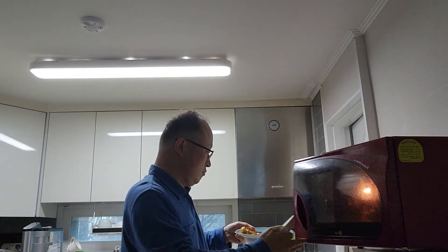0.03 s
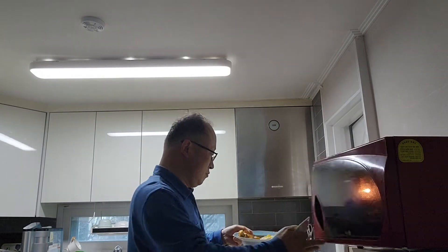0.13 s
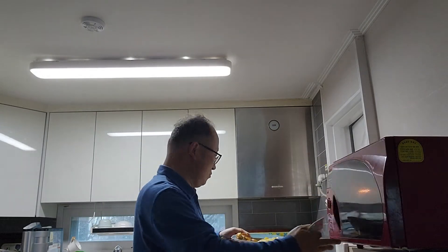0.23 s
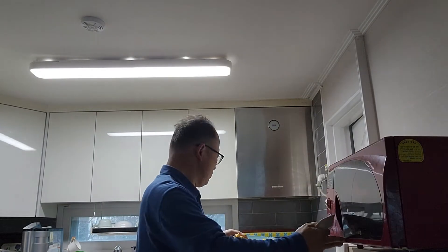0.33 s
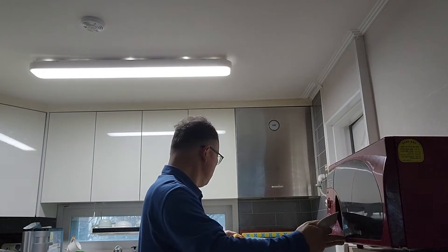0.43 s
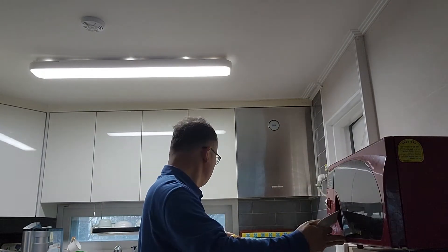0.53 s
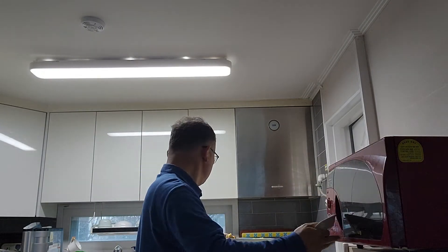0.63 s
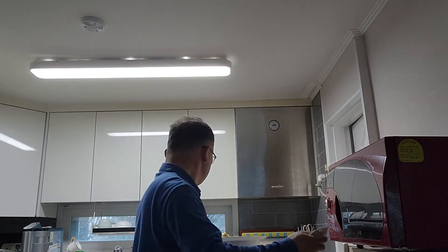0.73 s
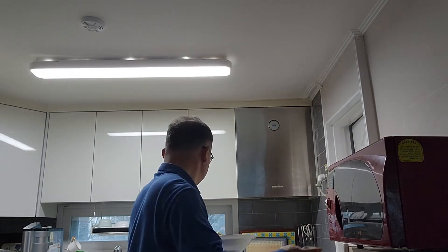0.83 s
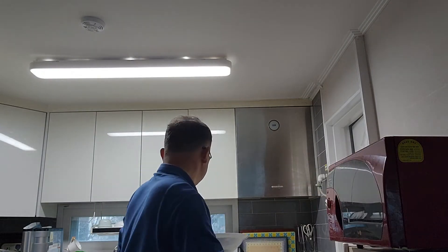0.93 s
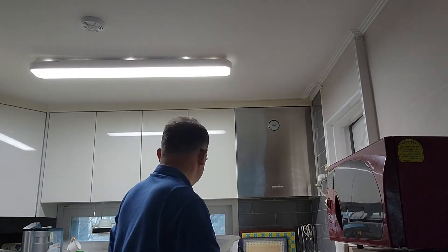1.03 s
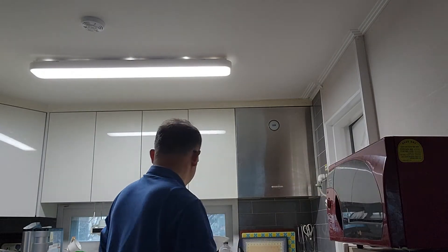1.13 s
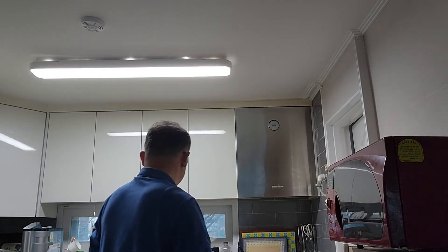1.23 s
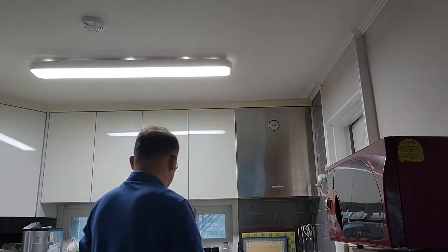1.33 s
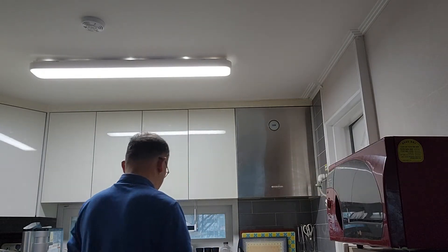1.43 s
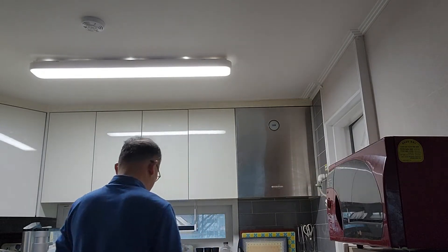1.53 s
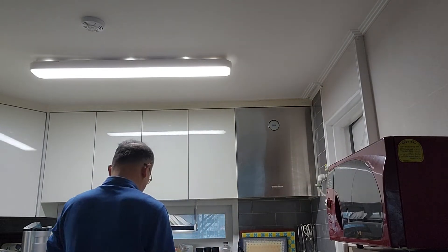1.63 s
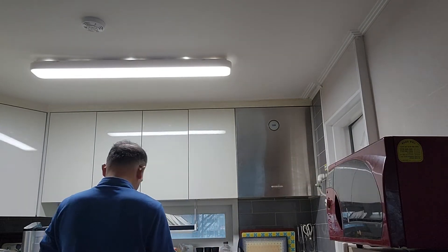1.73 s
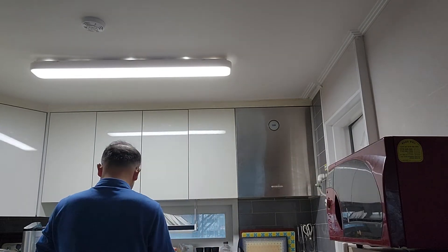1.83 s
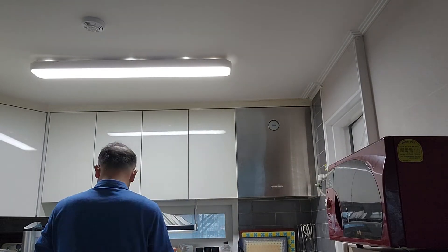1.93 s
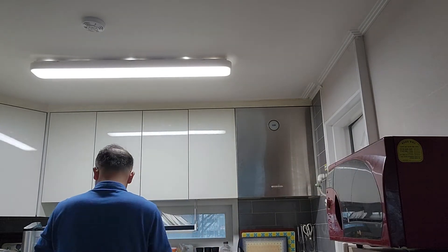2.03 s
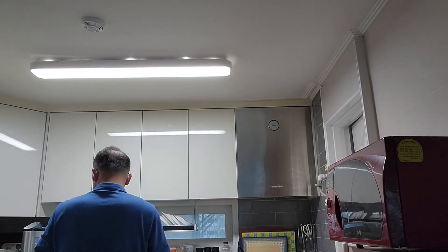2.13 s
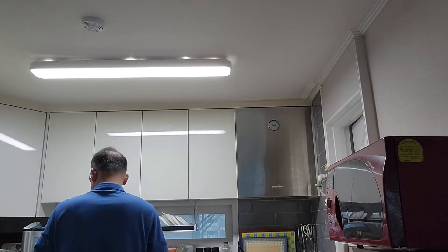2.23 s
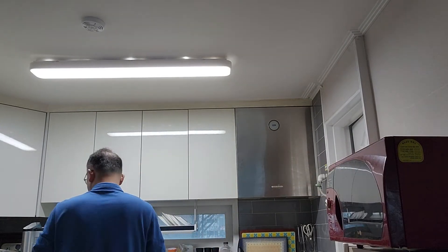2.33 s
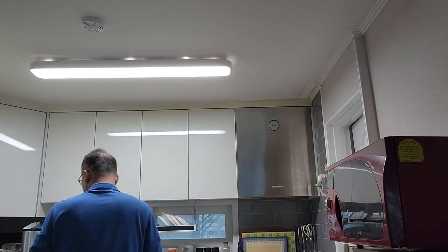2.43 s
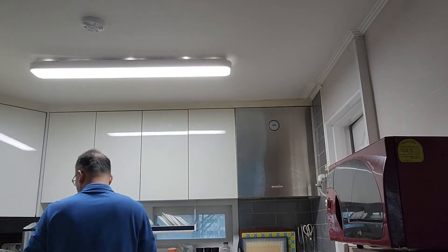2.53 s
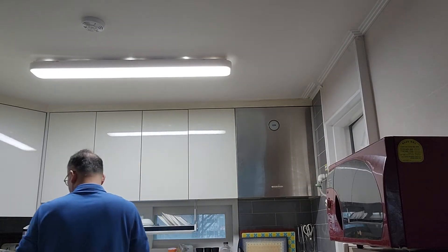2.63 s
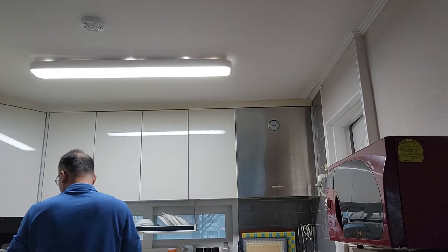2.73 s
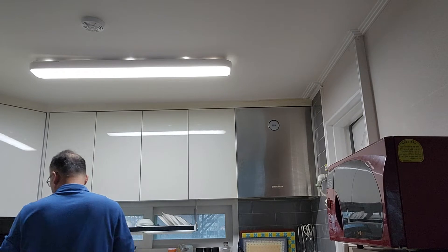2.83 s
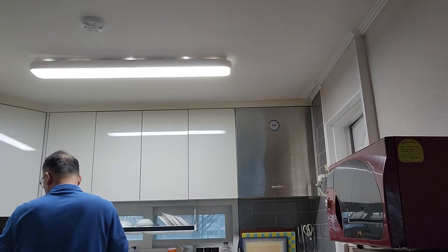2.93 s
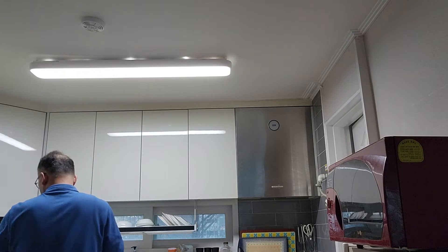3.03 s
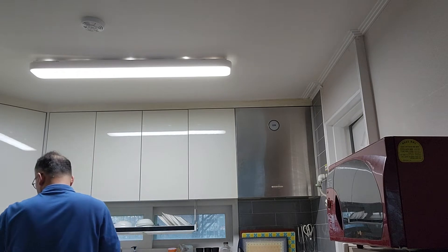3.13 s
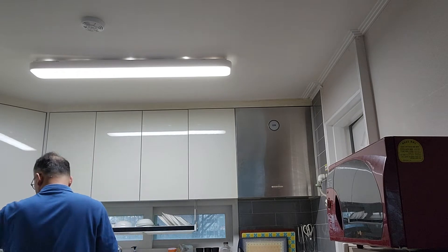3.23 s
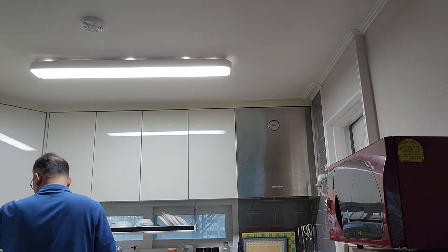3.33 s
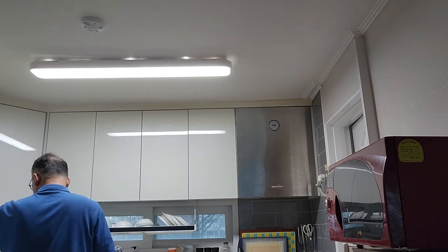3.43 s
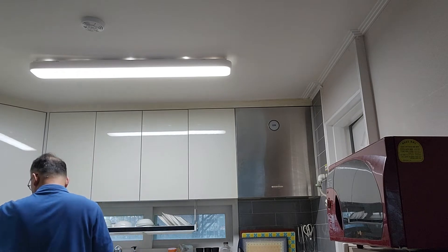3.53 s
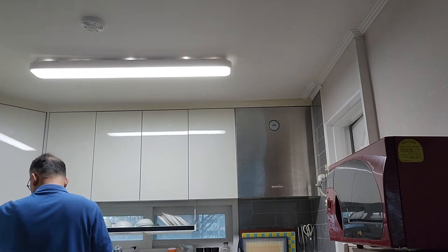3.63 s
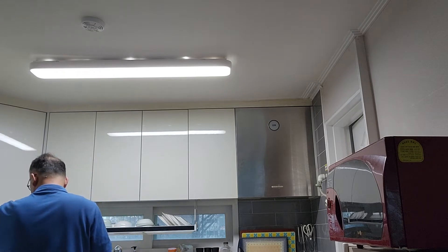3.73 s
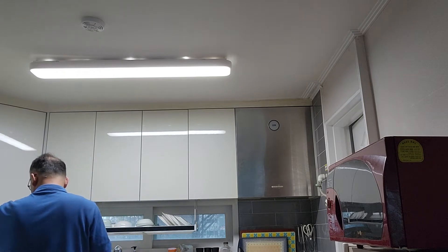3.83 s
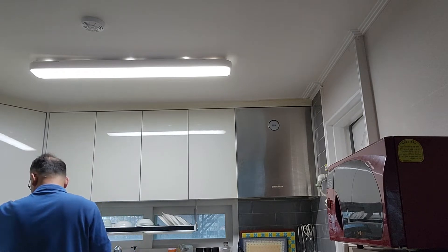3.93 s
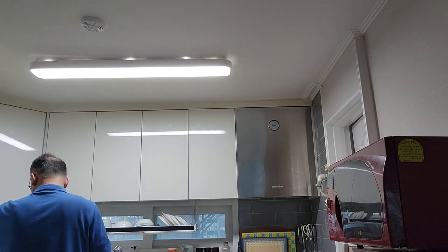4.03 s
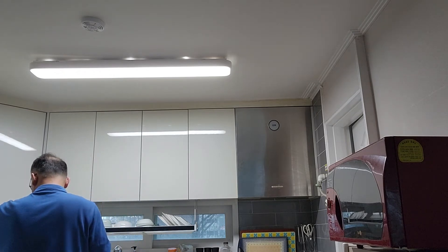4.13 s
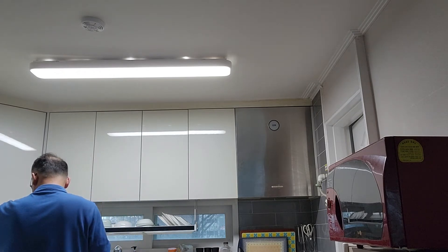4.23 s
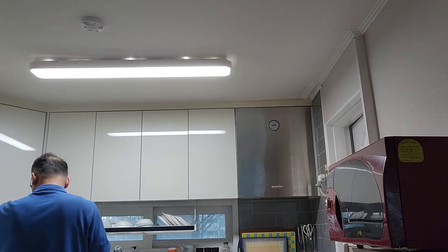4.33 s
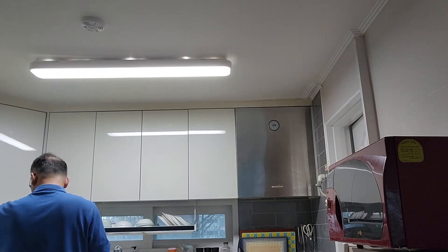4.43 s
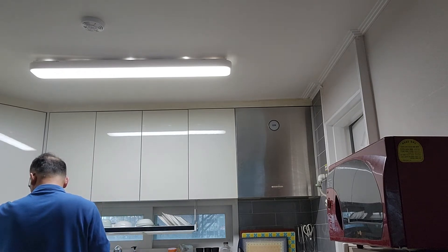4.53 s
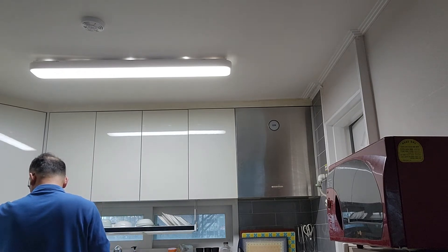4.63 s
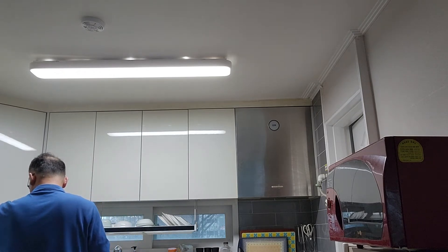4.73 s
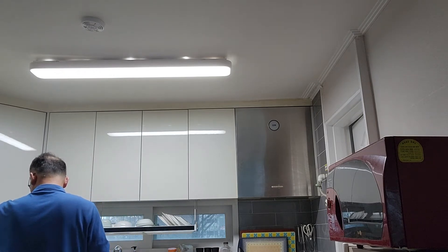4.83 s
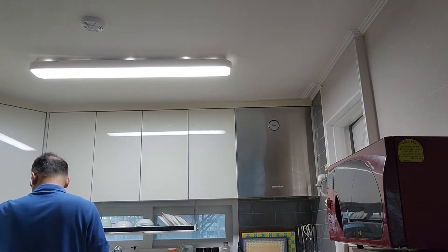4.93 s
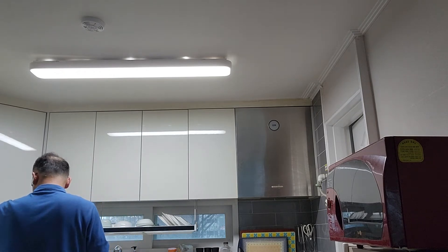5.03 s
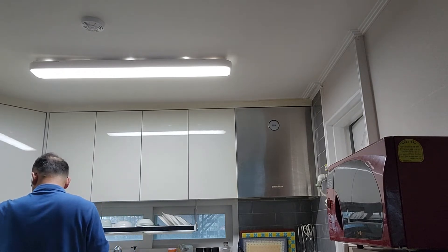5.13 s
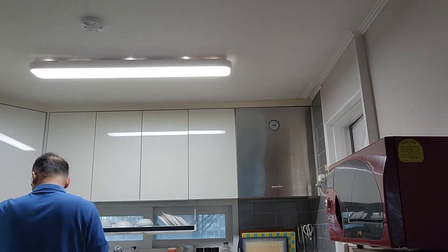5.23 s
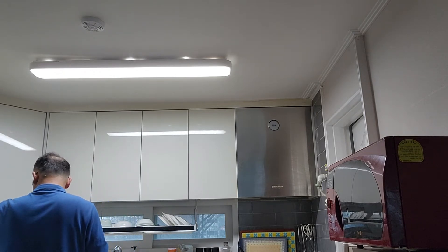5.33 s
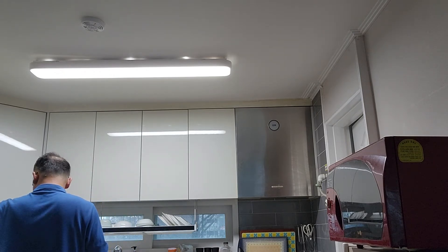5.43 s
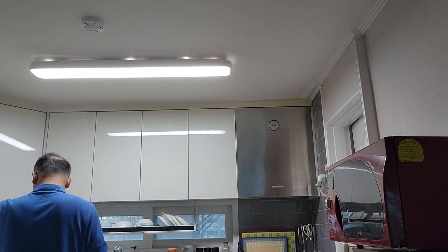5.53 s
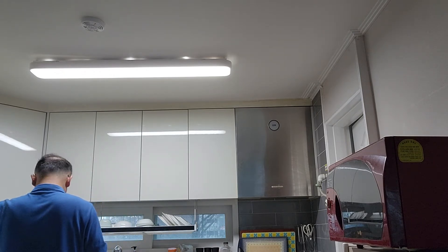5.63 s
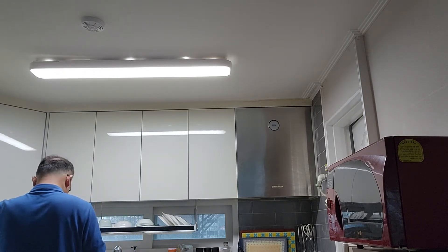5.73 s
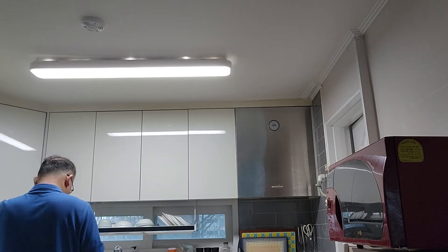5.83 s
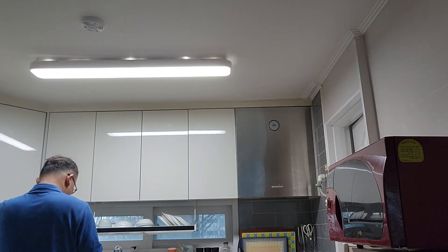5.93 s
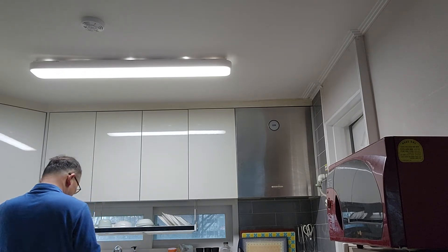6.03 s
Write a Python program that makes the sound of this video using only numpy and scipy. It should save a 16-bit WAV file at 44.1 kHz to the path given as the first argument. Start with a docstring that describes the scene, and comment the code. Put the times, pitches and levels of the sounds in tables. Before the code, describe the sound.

A low, faint room hum runs throughout in a small kitchen whose hard walls add a short echo. At about 0.4 seconds a microwave door is pushed shut: the latch clicks and snaps, the panels rattle briefly and the case gives a low thump. This is the loudest sound. A few faint handling taps and slight rustles follow between 0.8 and 2.3 seconds. At about 2.6 seconds china is put down across the room, slightly to the left, with a bright, ringing clatter, and it clatters again at about 3.1 seconds. From 3.7 seconds something soft, like a cloth, rubs in short, quiet strokes among light taps, strongest between 4.8 and 5.4 seconds. A soft hollow knock comes near 5.5 seconds and a last faint tap at 5.8 seconds.

```python
"""Microwave door, crockery and cloth.

A microwave door is pushed shut in a small hard-walled kitchen: the latch snaps, the door thumps
into the case. Across the room crockery is put down and clatters twice. Then something soft, like
a cloth, rubs in short strokes. Light handling taps in between; low room hum throughout."""
import sys
import numpy as np
from scipy import signal
from scipy.fft import rfft, irfft, next_fast_len
from scipy.io import wavfile

SR = 44100
rng = np.random.default_rng(int(sys.argv[2]) if len(sys.argv) > 2 else 0)


def digitize_waveform(pressure):
    """Quantize a signal to 16-bit integers and store it at the path in sys.argv[1].

    Rows of a 2-D input are taken as channels; values are limited to [-1, 1].
    """
    field = np.atleast_2d(pressure).T
    bounded = np.clip(field, -1, 1)
    quanta = np.round(bounded * 32767).astype(np.int16)
    wavfile.write(sys.argv[1], SR, quanta)


N = 268172

# flat spectrum: freq_hz, density_db
FLAT_SPECTRUM = [(20, 0), (20000, 0)]
# left-right likeness: freq_hz, correlation
MIC_COHERENCE = [(60, .93), (200, 0.5), (380, .7), (700, 0.44), (1300, .1), (2400, -0.051), (5000, 0.059),
                 (15000, 0)]
# kitchen reverberation: freq_hz, t60_s
ROOM_DECAY = [(60, .6), (170, 1), (340, 0.54), (680, 0.38), (1400, 0.36), (2700, 0.24), (5500, 0.17),
              (11000, 0.073), (16000, .18)]
# house rumble: freq_hz, density_db
RUMBLE_SPECTRUM = [(12, -37), (20, -2.5), (65, -3), (172, -17), (209, -16.5), (261, -18.5), (326, -18),
                   (375, -26), (408, -18.5), (482, -27), (693, -25), (775, -28.5), (1080, -33),
                   (1510, -36.5), (7500, -51), (10000, -59.5), (15800, -61.5)]
# motor somewhere in the house: pitch_hz, level_db
MOTOR_TONES = [(211.7, -79.5), (354, -84.5)]

# light handling taps: start_s, level_db
TAP_HITS = [(0.788, -41), (0.81, -40.5), (1.07, -42), (1.797, -39), (2.2441, -28), (2.258, -40),
            (3.805, -43.5), (4.104, -35.5), (4.552, -31.5), (5.8, -39.5)]
# tap colour: freq_hz, density_db
TAP_SPECTRUM = [(100, 5), (400, 14.5), (750, 11.5), (1000, 15), (1400, 7.5), (2200, 9.5), (4000, 3.5),
                (7000, -2), (11000, -21), (15500, -14.5)]
# soft knock: start_s, level_db, contact_s
KNOCK_PULSES = [(5.4535, -43, 0.00041), (5.461, -28, 0.0017)]
# hollow object: pitch_hz, level_db, t60_s
HOLLOW_MODES = [(690, -2, .05), (760, 0, .05)]

# hand strokes: start_s, swell_s, hold_s, hiss_db, body_db
CLOTH_STROKES = [ (1.006, 0.054, 0.067, -78.5, -83), (1.646, 0.026, .02, -79.5, -75.5),
                 (1.972, .02, .006, -71.5, -83), (2.33, 0.048, .04, -78, -92),
                 (3.734, 0.011, 0.013, -66, -67.5), (3.914, 0.027, 0.036, -59, -60.5),
                 (4.06, .03, 0.041, -70, -72.5), (4.145, 0.028, 0.011, -45.5, -51.5),
                 (4.253, 0.015, 0.0084, -52.5, -57), (4.474, 0.0082, 0.016, -65, -85),
                 (4.527, 0.019, 0.015, -67, -62), (4.621, 0.032, 0.03, -75, -68.5),
                 (4.756, 0.079, .035, -47, -56), (4.816, 0.043, 0.037, -44, -46.5),
                 (5.01, 0.033, 0.018, -42.5, -52), (5.089, 0.063, .02, -43.5, -49.5),
                 (5.175, 0.039, 0.079, -36, -47.5), (5.31, 0.012, 0.058, -41.5, -48),
                 (5.403, 0.018, 0.063, -56.5, -55), (5.495, 0.031, 0.051, -47.5, -53),
                 (5.585, 0.022, 0.022, -58.5, -53), (5.693, 0.024, 0.012, -53.5, -56), ]
# slipping fibres: freq_hz, density_db
FIBRE_SPECTRUM = [(400, -14), (900, -6), (1400, -3.5), (2000, 1), (2600, -4.5), (3200, 2.5), (4100, -1),
                  (5200, 2.5), (7500, 1), (9500, -2), (13500, 1), (15800, 0.5)]
# rustling folds: freq_hz, density_db
FOLD_SPECTRUM = [(100, -22.5), (190, -16), (270, -1), (330, -9), (440, 4), (580, -3.5), (730, 3),
                 (900, -12.5), (1060, -0.5), (1250, -20), (1700, -13), (3000, -25)]
# air moved by the cloth: freq_hz, density_db
FLAP_SPECTRUM = [(15, -2.5), (30, -3), (65, 5.5), (110, -3.5), (170, -14), (400, -82), (1000, -100)]

# dish contacts: start_s, plate_db, bowl_db, click_db
DISH_CONTACTS = [(2.567, -21, -31, -11.5), (2.572, -15, -38, -22), (2.598, -14, -30.5, -35),
                 (2.612, -18.5, -29, -26), (2.624, -30, -53, -36), (2.651, -44, -52, -35),
                 (3.0555, -30, -33.5, -15.5), (3.061, -27.5, -29, -16), (3.067, -28, -21, -13.5),
                 (3.074, -28.5, -19.5, -34), (3.106, -52, -53, -36)]
# china plate: pitch_hz, level_db, t60_s
PLATE_MODES = [(1250, -8, .05), (1345, -7, .06), (1502, -14, .2), (1927, -10, .06), (1963, 0, .1),
               (2094, -7, .07), (2310, -13, .04), (2580, -10, .045), (3330, -14, .04), (3438, -6, .07),
               (3452, -29, .29), (3720, -10, .04), (3502, -6.5, .07), (3592, -7, .05), (4590, -22, .04),
               (4870, -19, .06), (5110, -19, .05), (5530, -18, .07), (6210, -21, .04), (6630, -22, .05),
               (7230, -24, .05), (8200, -24, .04), (8350, -21, .06), (9450, -22, .05), (9600, -26, .05),
               (10400, -26, .06), (11530, -27, .04), (13090, -26, .06), (13770, -28, .05),
               (14160, -28, .06)]
# bowl: pitch_hz, level_db, t60_s
BOWL_MODES = [(780, -17, .06), (996, -14, .07), (1120, -6, .04), (1177, 1, .1), (1181, -12, .35),
              (1290, -8, .04), (1945, -2, .05), (2030, -2, .04), (2137, -7, .09), (2688, -5, .16),
              (2832, -14, .07), (3518, -9, .1), (3758, -12, .06), (4480, -12, .04), (5180, -11, .04),
              (5570, -15, .04), (6220, -15, .05), (6630, -14, .08)]
# china on china: freq_hz, density_db
CLICK_SPECTRUM = [(150, -17), (500, 0.5), (850, 17), (1200, 14.5), (1650, 5), (2400, 17), (2950, 4.5),
                  (3600, 5), (4100, 2.5), (5100, 6.5), (6500, 2), (8200, -5), (9000, -15.5), (15500, -14.5)]

# door contacts: start_s, panel_db, snap_db
DOOR_CONTACTS = [(0.3646, -14, -10.5), (0.3715, -16.5, -14.5), (0.388, -31, -23), (0.401, -17, -21.5),
                 (0.4077, -1.5, -8), (0.4128, -7, -4.5), (0.421, -6, -15.5)]
# door panels: pitch_hz, level_db, t60_s
PANEL_MODES = [(208, -6.5, 0.098), (278.5, -16.5, 0.32), (378, -9.5, 0.096), (395, -13, 0.063),
               (451, -15, .05), (512, -11, .04), (618, -7.5, .04), (719, -4.5, 0.053), (1040, -12.5, 0.04),
               (1400, -11.5, 0.034), (2025, -10.5, .018)]
# plastic latch: freq_hz, density_db
LATCH_SPECTRUM = [(40, -5.5), (75, 10), (130, 18.5), (210, 17), (310, 19.5), (450, 16.5), (700, 19),
                  (950, 19), (1400, 18), (2300, 17), (4000, 11), (7000, 7.5), (10000, 0.5), (15500, 0.5)]
# door lands, case rocks back: start_s, level_db, contact_s
THUMP_PULSES = [(0.4125, -6, 0.0026), (0.4585, -24.5, 0.0028)]
# oven case and room air: pitch_hz, level_db, t60_s
CASE_MODES = [(74.1, -4, 0.099), (93, -13.5, 0.12), (115, -4, .25), (133, -12, .17), (148.7, -8, 0.52),
              (161.4, -31, 1), (187, -17, 0.23), (211, -11.5, 0.21), (257, -17.5, 0.16)]


def from_db(db):
    """Decibels to gain."""
    return 10 ** (np.asarray(db) / 20)


def unit_rms(x):
    """Scale to unit power."""
    return x / np.sqrt(np.mean(x ** 2) + 1e-20)


def at_hz(points, hz):
    """Table lookup on a log-frequency axis."""
    known_hz, values = np.transpose(points)
    return np.interp(np.log(np.maximum(hz, 1)), np.log(known_hz), values)


def high_pass(x, hz, order):
    """Butterworth bass cut."""
    return signal.sosfilt(signal.butter(order, hz, "high", fs=SR, output="sos"), x)


def noise(colour, size=N):
    """Coloured noise at two microphones: alike in the bass, unrelated in the treble."""
    padded = next_fast_len(size)
    hz = np.arange(padded // 2 + 1) * SR / padded
    mid, side = rfft(rng.standard_normal((2, padded)))
    alike = np.clip(at_hz(MIC_COHERENCE, hz), -1, 1)
    pair = np.sqrt((1 + alike) / 2) * mid + np.sqrt((1 - alike) / 2) * side * [[1], [-1]]
    return irfft(pair * from_db(at_hz(colour, hz)), padded)[:, :size]


def bands(x, count):
    """Overlapping stereo bands; yields centre_hz, spectrum_share, band."""
    size = next_fast_len(x.shape[1])
    spectrum = rfft(x, size)
    hz = np.arange(size // 2 + 1) * SR / size
    centres_hz = np.geomspace(40, 16000, count)
    for centre_hz, one_hot in zip(centres_hz, np.eye(count)):
        window = at_hz(np.column_stack([centres_hz, one_hot]), hz)
        yield centre_hz, window.mean(), irfft(spectrum * window, size)[:, :x.shape[1]]


def drift(knots):
    """Random wander through evenly spaced knots."""
    return np.interp(np.linspace(0, knots - 1, N), np.arange(knots), rng.standard_normal(knots))


def shifting_noise(colour, depth_db, knots):
    """Noise whose bands swell and fade independently."""
    split = bands(noise(colour), count=18)
    return unit_rms(sum(band * from_db(depth_db * drift(knots)) for _, _, band in split))


def clicks(times_s, levels_db, signs=1):
    """Hard contacts: one impulse each."""
    out = np.zeros(N)
    out[np.round(np.asarray(times_s) * SR).astype(int)] = signs * from_db(levels_db)
    return out


def pushes(pulses):
    """Soft contacts: half-sine force pulses."""
    out = np.zeros(N)
    for start_s, level_db, contact_s in pulses:
        pulse = np.sin(np.linspace(0, np.pi, max(round(contact_s * SR), 3)))
        out[round(start_s * SR):][:len(pulse)] += from_db(level_db) * pulse / pulse.sum()
    return out


def ring(force, modes):
    """Each mode answers the force with a decaying sine."""
    out = np.zeros(N)
    for pitch_hz, level_db, t60_s in modes:
        radius = np.exp(-np.log(1000) / (t60_s * SR))
        step_rad = 2 * np.pi * pitch_hz / SR
        feedback = [1, -2 * radius * np.cos(step_rad), radius * radius]
        out += from_db(level_db) * signal.lfilter([0, np.sin(step_rad)], feedback, force + 1e-18)
    return out


def strike(times_s, levels_db, modes, spread_db):
    """Each contact lands on another spot: random strength and sign per mode."""
    draws = rng.standard_normal((len(times_s), len(modes), 2))
    out = np.zeros(N)
    for k, mode in enumerate(modes):
        strength, polarity = draws[:, k].T
        force = clicks(times_s, levels_db + spread_db * strength, np.sign(polarity))
        out += ring(force, [mode])
    return out


def kitchen(x, direct_gain, early_db, early_s, colour=FLAT_SPECTRUM, lag_s=0):
    """Direct sound (right mic lag_s late), early cupboard reflections and a tail longest in the bass."""
    t = np.arange(2 ** 15) / SR
    early = from_db(early_db) * np.exp(-t / early_s)
    house_tail = from_db(-32.5) * np.exp(-np.log(1000) * t / 1.6)
    response = np.zeros((2, len(t)))
    for centre_hz, share, band in bands(noise(FLAT_SPECTRUM, size=len(t)), count=22):
        room_tail = np.exp(-np.log(1000) * t / at_hz(ROOM_DECAY, centre_hz))
        gain = np.sqrt(share / len(t)) * from_db(at_hz(colour, centre_hz))
        response += gain * unit_rms(band * (room_tail + early + house_tail))
    pair = np.broadcast_to(x, (2, N))
    direct = np.array([pair[0], np.roll(pair[1], round(lag_s * SR))])
    return direct_gain * direct + signal.fftconvolve(pair, response, axes=1)[:, :N]


def room_tone():
    """Low house rumble with a faint motor hum."""
    t = np.arange(N) / SR
    hum = sum(np.sqrt(2) * from_db(db) * np.sin(2 * np.pi * hz * t) for hz, db in MOTOR_TONES)
    return from_db(-58.5) * unit_rms(noise(RUMBLE_SPECTRUM)) + hum


def worktop():
    """Small things are touched and put down; one knocks hollow."""
    impulses = clicks(*np.transpose(TAP_HITS))
    taps = kitchen(impulses, direct_gain=0, early_db=-7, early_s=0.0089, colour=TAP_SPECTRUM)
    knock = from_db(7.5) * high_pass(ring(pushes(KNOCK_PULSES), HOLLOW_MODES), hz=680, order=2)
    return taps + kitchen(knock, direct_gain=0.62, early_db=20, early_s=0.021)


def stroke(start_s, swell_s, hold_s, release_db_per_s=324, slide_db=-12.5, slide_db_per_s=104.5):
    """Stroke speed: the hand speeds up, holds and stops; loose cloth slides on a little."""
    t = np.arange(N) / SR - start_s
    swell = np.sin(np.pi / 2 * np.clip(t / swell_s, 0, 1)) ** 2
    stopped_s = np.maximum(t - swell_s - hold_s, 0)
    fade_db = np.maximum(-release_db_per_s * stopped_s, slide_db - slide_db_per_s * stopped_s)
    return swell * from_db(fade_db)


def cloth():
    """Slipping fibres hiss, folds add a dull rustle, hard strokes push the air."""
    power = np.zeros((2, N))
    for start_s, swell_s, hold_s, hiss_db, body_db in CLOTH_STROKES:
        power += np.outer(from_db([hiss_db, body_db]), stroke(start_s, swell_s, hold_s)) ** 2
    hiss_env, body_env = np.sqrt(power)
    hiss = hiss_env * shifting_noise(FIBRE_SPECTRUM, depth_db=3, knots=260)
    fibres = kitchen(hiss, direct_gain=0.84, early_db=14, early_s=0.0099)
    rustle = from_db(-4.5) * body_env * shifting_noise(FOLD_SPECTRUM, depth_db=-0.5, knots=200)
    folds = kitchen(rustle, direct_gain=2.31, early_db=10.5, early_s=0.0046)
    flap_env = from_db(3.5) * body_env * (body_env / body_env.max()) ** 0.24
    return fibres + folds + flap_env * unit_rms(noise(FLAP_SPECTRUM))


def rebounds(contacts, count=2, max_gap_s=0.01, gap_ratio=0.7, loss_db=15.5):
    """Each contact bounces, sooner and weaker every time; returns the expanded columns."""
    bounce = np.arange(count + 1)
    gaps_s = max_gap_s * gap_ratio ** bounce * rng.uniform(0.8, 1, (len(contacts), len(bounce)))
    start_s, *levels_db = np.transpose(contacts)[:, :, None]
    times_s = start_s + np.cumsum(gaps_s, axis=1) - gaps_s
    return [times_s.ravel()] + [(db - loss_db * bounce).ravel() for db in levels_db]


def china(times_s, levels_db, modes, spread_db, choked_db=-1.5, choked_t60_s=0.025):
    """A dish rings freely, and clacks with the same modes choked by the contact."""
    choked = [(pitch_hz, level_db + choked_db, choked_t60_s) for pitch_hz, level_db, _ in modes]
    return strike(times_s, levels_db, modes, spread_db) + strike(times_s, levels_db, choked, spread_db)


def dishes():
    """Plate and bowl chatter together as they settle; the walls add a short bright tail."""
    times_s, plate_db, bowl_db, click_db = rebounds(DISH_CONTACTS)
    plate = china(times_s, plate_db, PLATE_MODES, spread_db=5)
    bowl = china(times_s, bowl_db, BOWL_MODES, spread_db=1)
    radiated = from_db(-10.5) * high_pass(plate + bowl, hz=600, order=2)  # small dishes: little bass
    rings = kitchen(radiated, direct_gain=0.58, early_db=9, early_s=0.031, lag_s=0.00019)
    impulses = clicks(times_s, click_db)
    contact = kitchen(impulses, direct_gain=0, early_db=-1.5, early_s=0.025, colour=CLICK_SPECTRUM)
    return (rings + contact) * from_db([[1.1], [-1.1]])  # slightly left


def microwave_door():
    """Latch hooks ride in and snap home; the panels rattle and the case booms."""
    times_s, panel_db, snap_db = np.transpose(DOOR_CONTACTS)
    rattle = from_db(-11.5) * strike(times_s, panel_db, PANEL_MODES, spread_db=1.5)
    panels = kitchen(rattle, direct_gain=1.7, early_db=4.5, early_s=0.008, lag_s=0.0001)
    snaps = clicks(times_s, snap_db)
    latch = kitchen(snaps, direct_gain=0, early_db=5, early_s=0.03, colour=LATCH_SPECTRUM)
    clack = (high_pass(panels, hz=120, order=2) + latch) * from_db([[0.4], [-0.4]])
    boom = high_pass(ring(pushes(THUMP_PULSES), CASE_MODES), hz=56, order=4)
    boom_reverb = kitchen(from_db(-14) * boom, direct_gain=0, early_db=-4.5, early_s=0.0067)
    return clack + boom + boom_reverb


def scene():
    """Stereo sum of all sources."""
    return microwave_door() + dishes() + worktop() + cloth() + room_tone()


def record(dry, cutoff_hz=15900):
    """Small microphones lose the deep bass; peaks are rounded, the top is cut."""
    rounded = 1.673 * np.tanh(high_pass(dry, hz=36, order=2) / 1.531)
    return signal.sosfilt(signal.ellip(12, 0.1, 90, cutoff_hz, fs=SR, output="sos"), rounded)


dry = scene()
out = record(dry)
digitize_waveform(out)
```